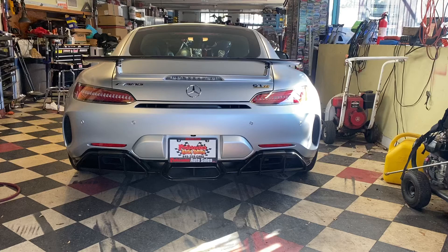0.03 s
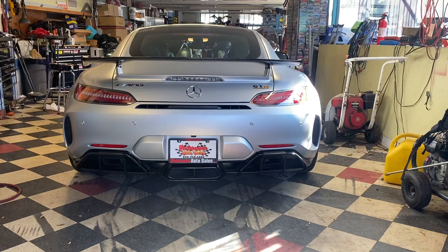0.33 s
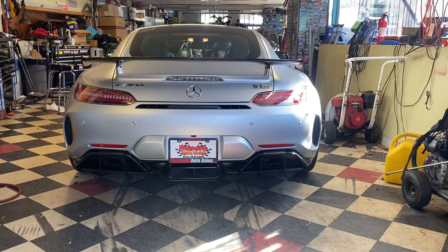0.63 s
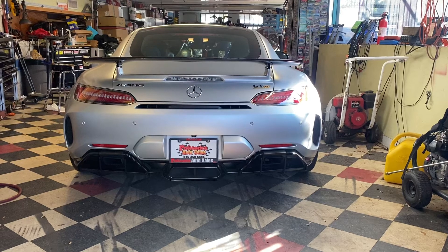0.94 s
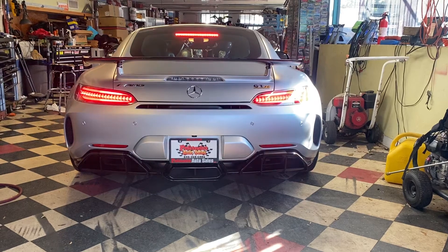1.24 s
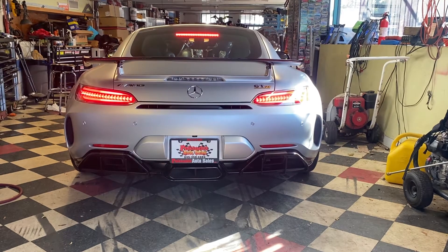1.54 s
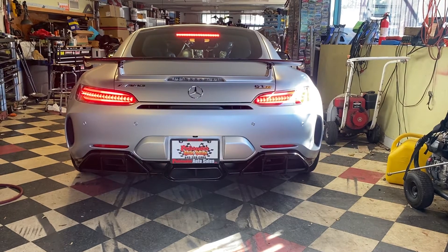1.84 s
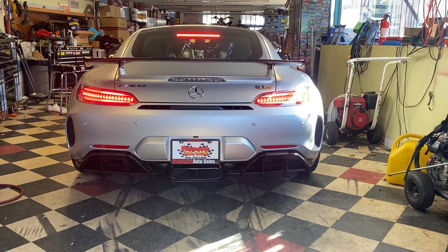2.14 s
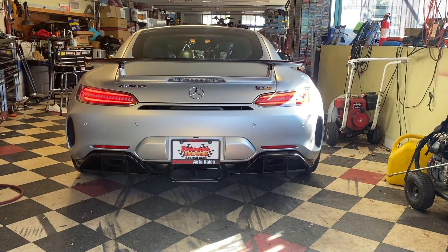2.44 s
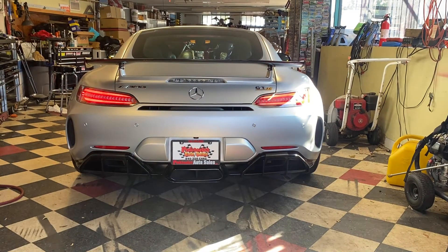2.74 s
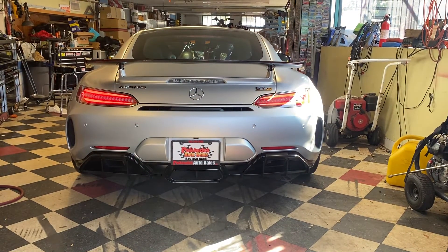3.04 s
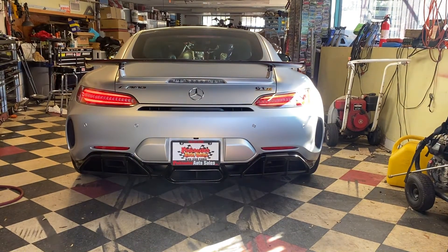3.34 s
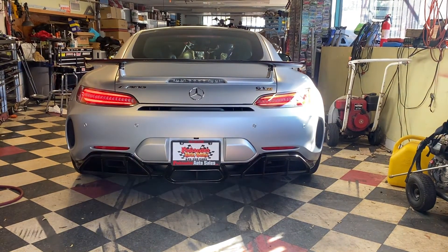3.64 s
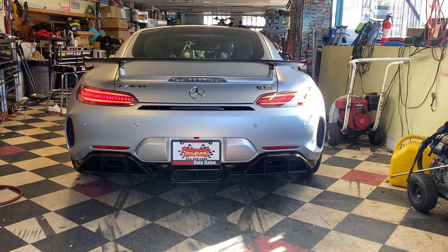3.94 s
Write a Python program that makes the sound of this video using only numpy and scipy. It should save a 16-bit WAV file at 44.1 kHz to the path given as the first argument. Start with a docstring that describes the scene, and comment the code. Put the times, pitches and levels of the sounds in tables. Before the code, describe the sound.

A V8 sports car starts cold in a garage, heard a few metres behind the tailpipes. The starter clacks and whirrs briefly, then the engine catches, revs up loudly and settles into a lumpy fast idle with pops.

```python
"""A cross-plane V8 sports car starts cold in a garage, heard a few metres behind its tailpipes.
The starter clacks in and whirrs for half a second; the engine catches, flares (revs up) and settles
to a lumpy fast idle. Uneven firings boom in the exhaust, rushing gas rasps and hisses,
and late-burning fuel pops in the pipes. The room echoes and rumbles faintly."""
import sys
import numpy as np
from scipy import signal
from scipy.fft import rfft, irfft
from scipy.io import wavfile
from scipy.ndimage import uniform_filter1d

SR = 44100
rng = np.random.default_rng(int(sys.argv[2]) if len(sys.argv) > 2 else 0)


def dump_mix(stems):
    """Bounce the given channels to the path in sys.argv[1] as a 16-bit WAV at rate SR."""
    frames = np.atleast_2d(stems).T  # one column per channel
    limited = np.clip(frames, -1, 1)  # hard clip at full scale
    pcm = np.round(limited * 32767).astype(np.int16)
    wavfile.write(sys.argv[1], SR, pcm)


N = 176400
STARTER_S, CATCH_S, FLARE_END_S = 1.304, 1.8, 2.5

# Bright noise of the gas and the relay. Each row: frequency in Hz, relative level in dB.
HISS_SHAPE = [(1500, -22), (2900, 5), (3600, 7.5), (3950, 1.5), (5100, 5.5), (5600, 1), (7400, -1),
              (9500, -8.5), (15500, -6.5)]


def engine():
    """Firings ring the exhaust pipes; each lets out a puff of rasping, hissing gas."""
    # Crankshaft speed. Each row: time in seconds, turns per minute.
    crank_speed = [(1.8, 1066.0), (1.9, 1312.0), (2.0, 1370.0), (2.1, 1474.0), (2.2, 1468.0), (2.3, 1635.0),
                   (2.45, 1539.0), (2.6, 1408.0), (2.7, 1331.0), (2.9, 1299.0), (3.3, 1275.0),
                   (3.65, 1258.0), (4.0, 1179.0)]
    # The cylinders in firing order. Each row: relative strength in dB, shift in arrival time in ms.
    cylinders = [(5.9, 0.6), (0.5, 0.3), (0.2, 2.0), (-2.8, 0.4), (5.7, 1.1), (3.3, 3.9), (4.8, -3.8),
                 (2.4, 1.0)]
    # Tone of the pipes and garage, the broad roar and the swirling gas.
    # Each row: frequency in Hz, relative level in dB.
    pipe_shape = [(20, -51), (43, -10), (53, -28), (68, -1.5), (85, -0.5), (107, 4), (146, 11), (185, -11),
                  (240, -19.5), (290, -8), (320, -25), (382, 7), (430, -18.5), (472, -7), (525, -26),
                  (568, -2), (640, -27.5), (675, -13.5), (760, -30), (1200, -25.5), (5000, -111.5)]
    roar_shape = [(25, -36), (44, 17), (56, -5), (130, -26.5), (180, 16.5), (235, 2.5), (290, 8), (370, 4),
                  (430, -6), (480, -1.5), (530, -4.5), (570, -0.5), (690, -5), (900, -10), (1500, -14),
                  (8000, -89)]
    rasp_shape = [(150, -31), (280, 8.5), (380, 0), (480, -7.5), (570, 10.5), (700, -3.5), (1050, 3),
                  (1250, -0.5), (1430, 9.5), (1560, 7), (1700, -2.5), (2050, 0.5), (2220, -4.5),
                  (2370, 7.5), (2470, -8.5), (2590, 7), (2850, -28), (3500, -54), (6000, -55)]
    # The exhaust's mix. Each row: time in seconds, then boom, bark, roar, rasp and hiss in dB.
    exhaust_levels = [(1.8, -64, -55, -62, -58, -52.5), (1.835, -32, -46, -66, -39.5, -42),
                      (1.888, -24.5, -41.5, -32, -32, -39.5), (1.98, -25, -40, -36, -35.5, -41),
                      (2.14, -35, -37.5, -33, -35, -43.5), (2.25, -32, -34.5, -29.5, -39.5, -48.5),
                      (2.36, -34, -34.5, -32.5, -39.5, -51), (2.55, -32, -44.5, -42.5, -38.5, -49),
                      (2.7, -31.5, -38.5, -38, -37, -45), (3.1, -30, -33.5, -41, -35.5, -42.5),
                      (3.45, -27.5, -31, -39, -33, -41), (4.0, -25, -33, -37, -32.5, -40)]
    t = clock()
    running = t >= CATCH_S
    rpm = np.interp(t, *np.array(crank_speed).T)
    count = len(cylinders)
    firings = np.cumsum(rpm * running) * count / 120 / SR  # each cylinder fires once in two turns
    index = np.arange(int(firings[-1]) + 1)
    strength_db, shift_ms = np.array(cylinders)[index % count].T
    time_jitter, size_jitter, puff_jitter = rng.standard_normal((len(index), 3)).T
    when = np.interp(index, firings[running], t[running]) + (shift_ms + 0.18 * time_jitter) / 1000
    scatter_db = np.where(when < FLARE_END_S, 3.5, 1.6)  # fuel burns raggedly until the speed settles
    size = undb(strength_db + scatter_db * np.tanh(size_jitter))
    # Faster running means hotter gas, which raises the pipes' pitch: their clock runs faster.
    heat = 1 + 0.082 * (rpm / np.median(rpm[running]) - 1)
    pipe_clock = np.cumsum(running * heat)
    pulses = np.bincount(np.interp(when, t, pipe_clock).astype(int), size, N)[:N]
    pipe, roar = (np.interp(pipe_clock, np.arange(N), colour(pulses, shape)) * running
                  for shape in (pipe_shape, roar_shape))
    boom = signal.sosfiltfilt(signal.butter(4, 215, fs=SR, output="sos"), pipe)
    bark = pipe - boom
    puff = np.exp(-(firings % 1)) * undb(3.57 * puff_jitter)[firings.astype(int)]
    rasp = air(rasp_shape, (puff + 0.88) * running)  # puffs on top of a steady flow
    hiss = air(HISS_SHAPE, (puff + 1.2) * running)
    times, *levels = np.array(exhaust_levels).T
    boom_gain, bark_gain, roar_gain, rasp_gain, hiss_gain = (
        undb(np.interp(t, times, db)) * np.sqrt(running.mean()) for db in levels)
    midrange = unit(bark) * bark_gain + unit(roar) * roar_gain
    bass = unit(boom) * boom_gain + drone(boom, firings / count) * running
    return bass + midrange + undb(-3) * room(midrange) + rasp * rasp_gain + hiss * hiss_gain


def drone(boom, cycles):
    """The exhaust hums a clean tone that follows the engine's speed and hardens during the flare."""
    # The hum's strength. Each row: time in seconds, level in dB.
    drone_levels = [(1.9, -48), (2.02, -44), (2.11, -23.5), (2.22, -35.5), (2.33, -48), (2.46, -32),
                    (2.6, -36.5), (2.75, -33), (3.3, -32.5), (4.0, -40)]
    t = clock()
    wave = np.exp(2j * np.pi * 10 * cycles)  # ten waves per engine cycle (two turns)
    boom_match = signal.fftconvolve(boom / wave, np.hanning(int(.3 * SR)), mode="same")
    tone = wave * np.exp(1j * np.angle(boom_match))  # keeps in step with the boom
    flare = uniform_filter1d(1. * (t < FLARE_END_S), size=8000)
    overtones = undb(-11) * flare * (tone ** 2 + tone ** 3)
    gain = undb(np.interp(t, *np.array(drone_levels).T))
    return np.sqrt(2) * gain * (tone + overtones).real


def shudder():
    """The first firings set off a deep ringing that swells and dies away."""
    pitch_hz, swell_s = 48.4, 0.057
    age = clock() - CATCH_S
    return undb(-27) * age / swell_s * fade(CATCH_S, swell_s) * np.sin(2 * np.pi * pitch_hz * age)


def afterfire():
    """Late-burning fuel pops: each quick swell of pressure rings the tailpipes and echoes."""
    # The pops. Each row: start in seconds, relative level in dB.
    pop_events = [(1.802, -25), (1.89, -21), (1.967, -20), (2.137, -22), (2.264, -20), (2.281, -14),
                  (2.317, -18), (2.327, -18), (2.628, -16), (2.808, -12), (2.9, -14.5), (3.085, -21),
                  (3.146, -18.5), (3.181, -15.5), (3.348, -21), (3.415, -20), (3.463, -20), (3.554, -20),
                  (3.603, -21), (3.749, -19), (3.848, -16.5), (3.947, -21)]
    # Tailpipe tones. Each row: frequency in Hz, relative level in dB, seconds to fade by 60 dB.
    tailpipe_tones = [(1105, -10, 0.03), (1442, 0.5, 0.023), (1575, -16, 0.046), (2140, -13.5, 0.029),
                      (2343, -16.5, 0.056), (2593, -9, 0.017), (3570, -21, 0.0051)]
    rise_s, crack_s = 0.0011, 0.01
    t = clock()[:SR // 10]
    hz, db, ring_s = np.array(tailpipe_tones).T[:, :, None]
    swell = 1 - np.exp(-(t / rise_s) ** 2)
    soften = signal.butter(2, 2090, fs=SR, output="sos")
    out = np.zeros(2 * N)
    for start, pop_db in pop_events:
        detune, scatter_db, phase = rng.standard_normal((3, len(hz), 1))
        tones = np.sin(2 * np.pi * (hz * (1 + 0.011 * detune) * t + phase))
        ring = undb(db + scatter_db - 60 * t / ring_s) * tones
        crack = signal.sosfilt(soften, rng.standard_normal(len(t))) * np.exp(-t / crack_s)
        crack_db = 0 if start < FLARE_END_S else -11  # pops crack harder during the flare
        at = int(start * SR)
        out[at:at + len(t)] += undb(pop_db - 1) * swell * (ring.sum(0) + undb(crack_db) * crack)
    pops = signal.sosfilt(signal.butter(2, 546, "high", fs=SR, output="sos"), out[:N])
    return pops + undb(-7.5) * room(pops)


def starter():
    """A small gear clacks in and rattles, then whirrs while the pistons chug, squeezing air."""
    # Noise of the gear striking and spinning. Each row: frequency in Hz, relative level in dB.
    clack_shape = [(100, -27), (220, -9), (340, -3), (500, -12), (780, -4), (1200, -5), (1430, 8.5),
                   (1560, -1), (1700, 5), (1900, -4), (2150, -2), (3100, -16), (7000, -9), (15000, -29)]
    whirr_shape = [(59, -42), (100, -4.5), (400, -2.5), (520, -7.5), (880, -3.5), (1500, -9), (2200, -10),
                   (3000, -12), (5500, -14), (8000, -26), (15000, -31.5)]
    # Gear whine. Each row: frequency in Hz and level in dB, around which the tone wavers.
    whine_tones = [(900, -73), (1020, -68.5), (2150, -66.5)]
    # Piston squeezes. Each row: peak time in seconds, level in dB, half length in seconds.
    piston_strokes = [(1.481, -57, 0.06), (1.735, -64.5, 0.182)]
    t = clock()
    turning = uniform_filter1d(1. * (t > STARTER_S) * (t < CATCH_S + .05), size=400)
    strike = undb(-48) * fade(STARTER_S + 0.0062, decay_s=0.014)
    rattle = undb(-56) * fade(STARTER_S, decay_s=0.088)
    clack = air(clack_shape) * uniform_filter1d(strike + rattle, size=150)
    strokes = sum(undb(db) * np.exp(-((t - peak) / half) ** 2) for peak, db, half in piston_strokes)
    speed = 1 + 0.022 * wander(1500) - .06 * strokes / strokes.max()  # each squeeze slows the starter
    angle = 2 * np.pi * np.cumsum(speed) / SR
    whine = sum(undb(db) * wander(500) * np.sin(hz * angle) for hz, db in whine_tones)
    whirr = undb(-60) * air(whirr_shape) + whine
    chug = air([(20, -11), (46, 3.5), (90, -2), (160, -7), (400, -68)]) * strokes
    return clack + turning * (whirr + chug)


def clunk():
    """The starter's housing rings with a rough, falling tone as the gear goes in."""
    start_hz, fall_hz_per_s, swell_s = 373, 1100, 0.036
    age = np.clip(clock() - STARTER_S, 0, None)
    tone = np.sin(2 * np.pi * (start_hz - fall_hz_per_s * age / 2) * age)
    roughness = 1 + .8 * wander(250)
    return undb(-49.5) * age / swell_s * fade(STARTER_S, swell_s) * tone * roughness


def relay():
    """The starter's electric switch ticks faintly just before the clack."""
    return undb(-77.5) * air(HISS_SHAPE) * fade(start_s=1.245, decay_s=0.071)


def room(x):
    """The garage's echo: a wash of reflections that dies away quickly."""
    echo_s = 0.32  # time to fade by 60 dB
    tail = air([(60, -8.5), (300, 2.0), (4000, 5.5), (15000, -20.0)]) * fade(0.0056, echo_s / np.log(1000))
    return signal.fftconvolve(x[None], tail / np.sqrt(np.sum(tail ** 2) / 2), axes=1)[:, :N]


def garage():
    """A soft low thump as the microphone switches on, then faint room rumble."""
    # The quiet room. Each row: frequency in Hz, relative level in dB.
    rumble_shape = [(15, -61), (25, -27), (68, -3), (98, -11), (230, -10), (600, -23.5), (1000, -21.5),
                    (4270, -48), (15600, -85)]
    start_s, thump_hz = 0.071, 49
    t = clock()
    thump = undb(-38.5) * fade(start_s, decay_s=0.016) * np.sin(2 * np.pi * thump_hz * (t - start_s))
    return undb(-67) * air(rumble_shape) * (t > start_s) + thump


def air(shape, envelope=1):
    """Stereo noise, wider in the treble; shape sets its tone and envelope its rise and fall."""
    # Stereo width. Each row: frequency in Hz, level of the sides against the middle in dB.
    width = [(60, -43.5), (130, -9.5), (300, -13), (600, -4), (1400, -1.5), (5000, -7.5), (9000, 1),
             (14000, -1.5)]
    mid, side = colour(rng.standard_normal((2, N)) * envelope, shape)
    return (mid + colour(side, width) * np.array([[1], [-1]])) / np.std(mid)


def colour(x, shape):
    """Filter a sound with a table of (Hz, dB) rows."""
    cepstrum = irfft(np.log(undb(db_at(shape))))
    cepstrum[1:N] *= 2  # folded so that ringing comes only after a hit
    cepstrum[N + 1:] = 0
    return irfft(rfft(x, 2 * N) * np.exp(rfft(cepstrum)))[..., :N]


def db_at(shape):
    """Fill in the level at every frequency between (Hz, dB) rows."""
    hz, db = np.array(shape, float).T
    return np.interp(np.log(np.arange(N + 1) * SR / (2 * N) + 1), np.log(hz), db)


def wander(samples):
    """A random wobble, smoothed over this many samples."""
    return unit(uniform_filter1d(rng.standard_normal(N), size=samples))


def fade(start_s, decay_s):
    """Jump to 1 at the start, then die away."""
    age = clock() - start_s
    return (age >= 0) * np.exp(-np.abs(age) / decay_s)


def undb(db):
    """Turn decibels into a gain."""
    return 10 ** (np.asarray(db) / 20)


def unit(x):
    """Scale to an average (rms) level of 1."""
    return x / np.sqrt(np.mean(x ** 2))


def clock():
    """Time of every sample in seconds."""
    return np.arange(N) / SR


def scene():
    """Mix all sources; some pitches lean a little left, others right."""
    # Stereo balance. Each row: frequency in Hz, left minus right in dB.
    balance = [(100, 0.74), (200, 3), (300, -2), (500, -1.5), (1400, 3.5), (3000, 2.5), (9000, 0)]
    mix = engine() + shudder() + afterfire() + starter() + clunk() + relay() + garage()
    ear_gains = undb(np.array([[.5], [-.5]]) * db_at(balance))
    return irfft(rfft(mix, 2 * N) * ear_gains)[:, :N]


def record(dry):
    """Cut the very highest treble."""
    top_hz = 15850
    return signal.sosfilt(signal.ellip(8, .2, 70, top_hz, fs=SR, output="sos"), dry)


dry = scene()
out = record(dry)
dump_mix(out)
```